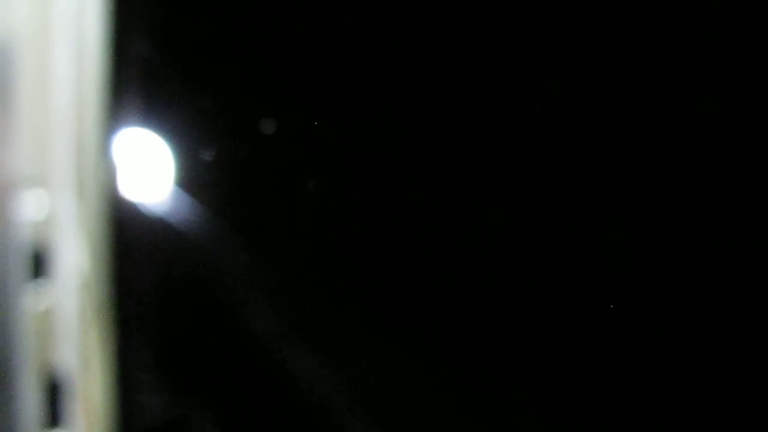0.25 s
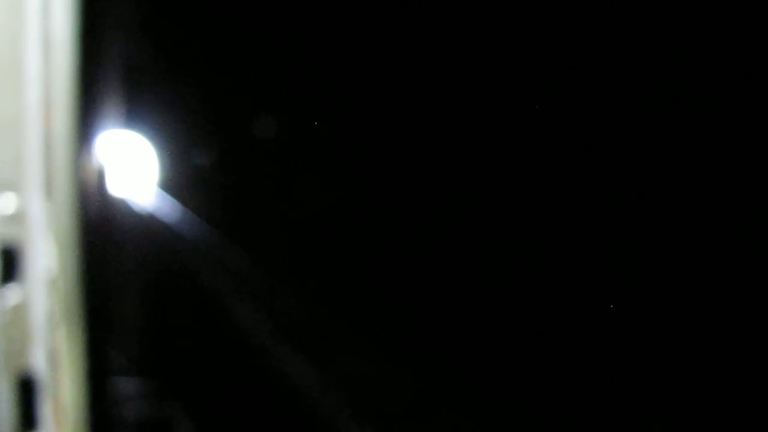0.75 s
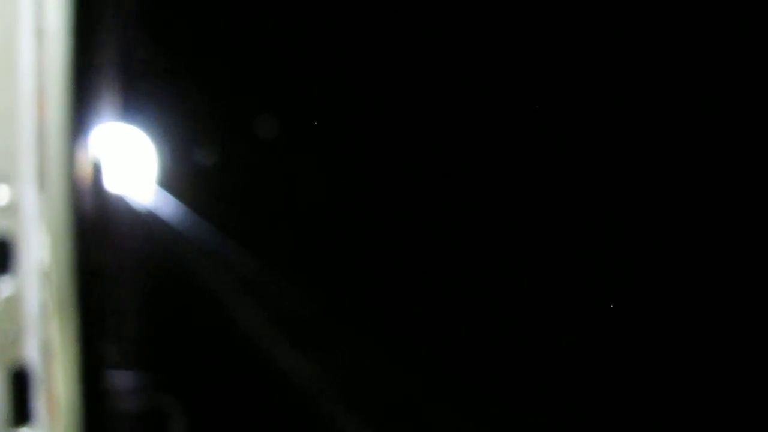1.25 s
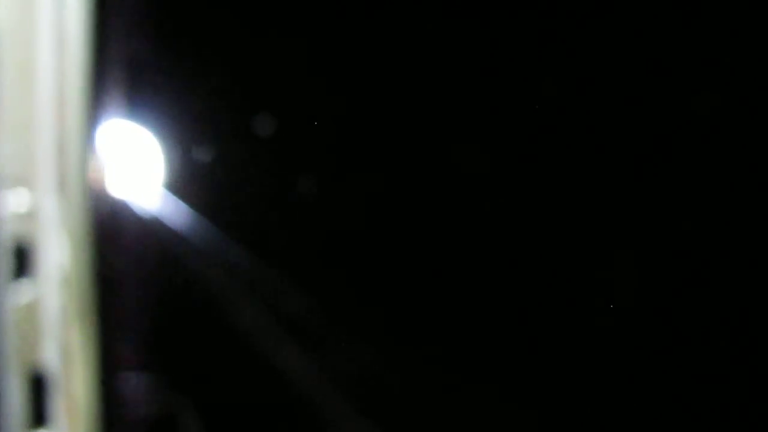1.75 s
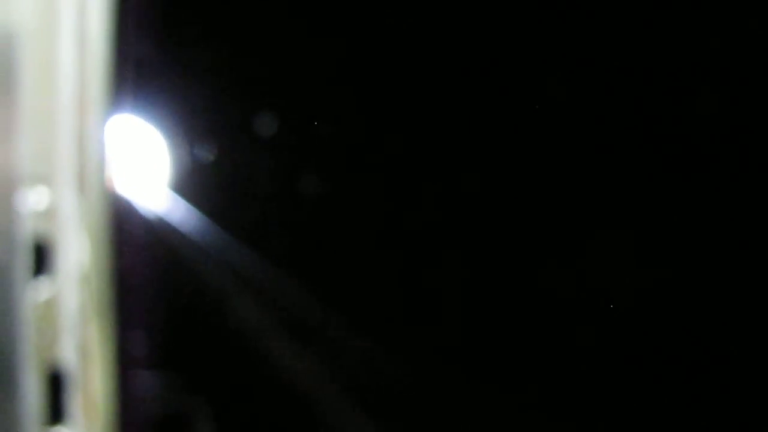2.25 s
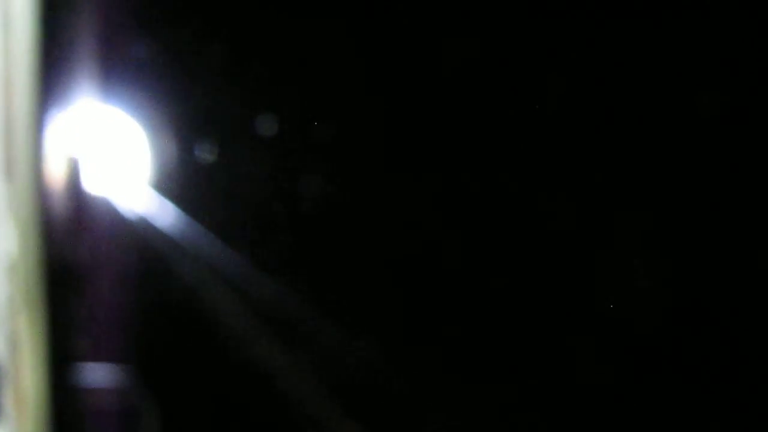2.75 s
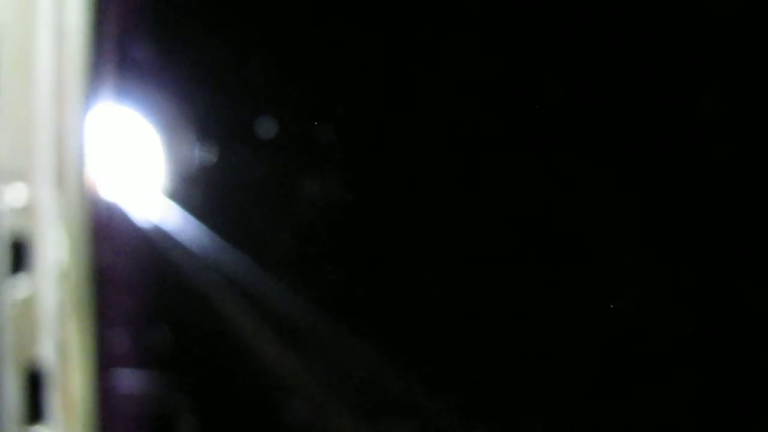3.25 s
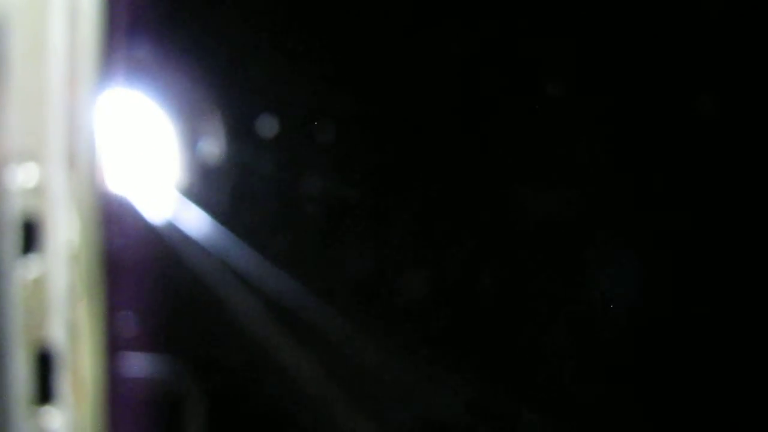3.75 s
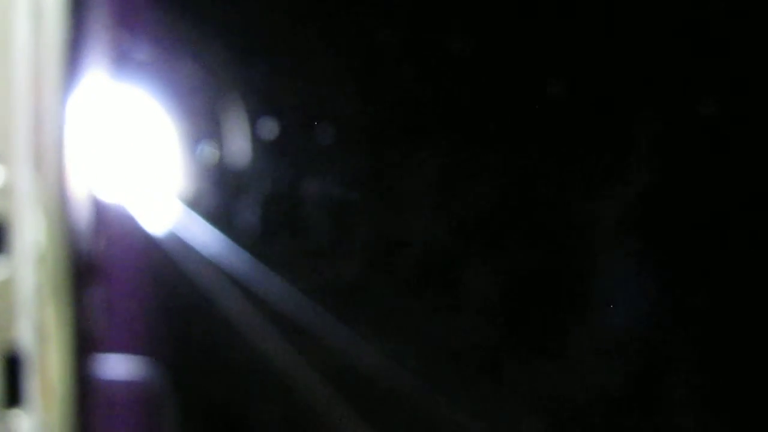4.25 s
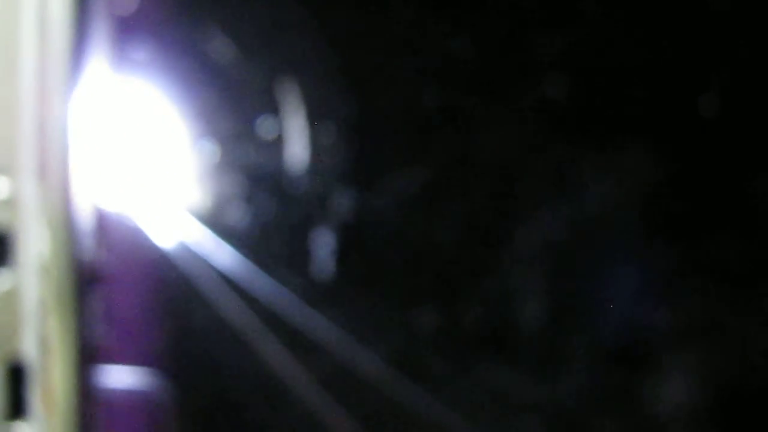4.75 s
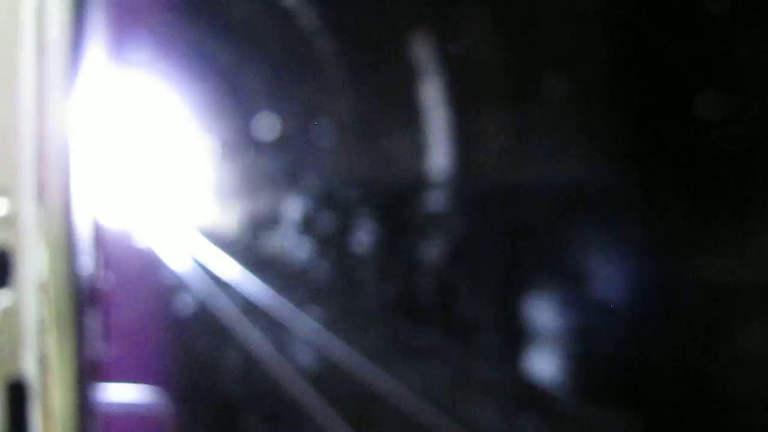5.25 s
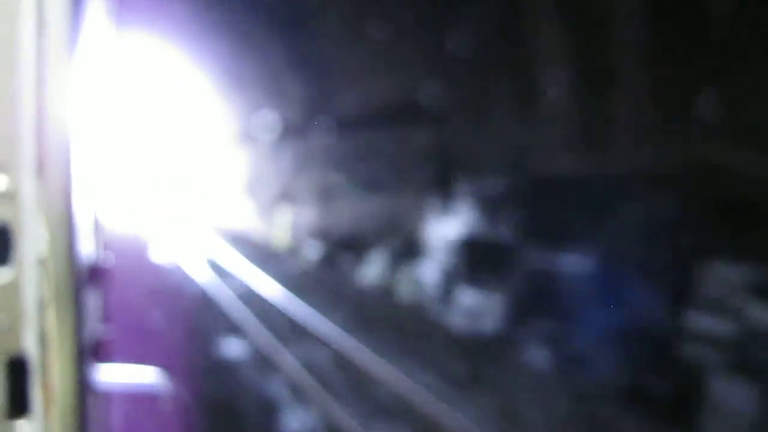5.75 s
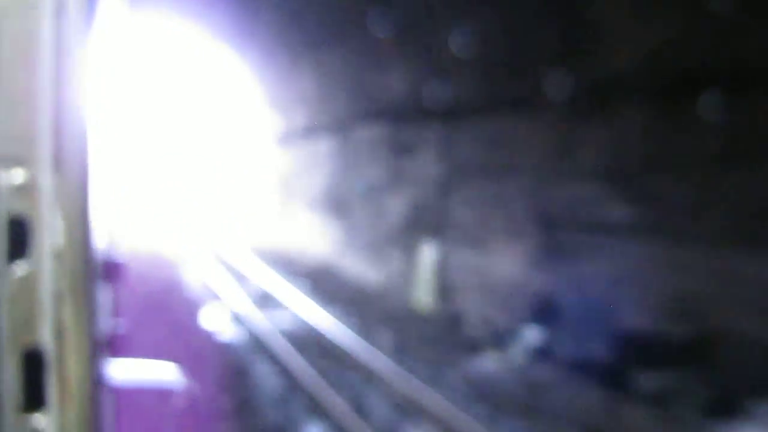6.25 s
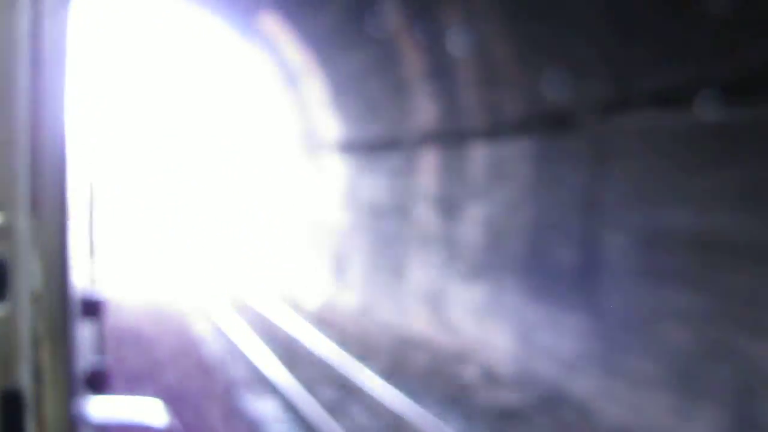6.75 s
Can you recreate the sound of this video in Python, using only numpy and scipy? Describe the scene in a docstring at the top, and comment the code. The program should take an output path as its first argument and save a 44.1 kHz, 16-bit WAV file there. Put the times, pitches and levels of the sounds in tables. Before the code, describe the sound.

At the open window of a train carriage in a tunnel, harsh wind thumps and flutters against the microphone, clipping in rasping bursts. Beneath it the wheels roar and ring steadily. A thin whine rises midway and fades, faint high steel singing comes and goes, and a bright hiss grows towards the tunnel mouth.

```python
"""In a railway tunnel, at the open window of a passenger carriage: the train runs towards the tunnel mouth.
Coloured noise makes the wheels roar and ring; narrow noise bands make a whine and the thin song of flanges.
At two microphone ports in the slipstream, noise that follows gusts and lulls makes the buffeting,
with knocks, puffs and ticks; the hardest blasts overload the ports and rasp."""
import sys
import numpy as np
from scipy import signal
from scipy.fft import irfft
from scipy.io import wavfile
from scipy.ndimage import uniform_filter1d, map_coordinates

SR = 44100
rng = np.random.default_rng(int(sys.argv[2]) if len(sys.argv) > 2 else 0)


def int16_out(signal):
    """Quantize to a 16-bit WAV file."""
    q = np.round(np.clip(np.atleast_2d(signal).T, -1, 1) * 32767)
    wavfile.write(sys.argv[1], SR, q.astype(np.int16))


N = 309096
TIME = np.arange(N) / SR   # s
BINS = np.maximum(np.arange(N // 2 + 1) * SR / N, 1)   # Hz

# Bright hiss off the rails, towards the tunnel mouth. Each row: time in seconds, level in dB.
MOUTH_LEVEL = [(0, -88), (3.2, -59), (4.6, -64), (6.0, -50.5), (6.4, -47), (7.01, -45)]
# Its colour. Each row: frequency in Hz, relative density in dB per Hz.
HISS_COLOUR = [(2000, -15), (3400, 6), (5000, 6), (7000, 3), (9000, 4.5), (12000, 8.5), (16000, 7)]

# Spells in which a flange sings on the rail. Each row: start in seconds, end in seconds,
# relative level in dB, band (0 low, 1 middle, 2 top).
SINGING_SPELLS = [(0.0, 1.45, -66, 2), (0.0, 0.2, -68, 1), (0.846, 1.35, -65, 1), (1.8, 2.701, -69, 2),
                  (2.15, 2.749, -62, 1), (3.6, 5.051, -57.5, 0), (3.6, 5.202, -67, 2),
                  (5.75, 6.749, -66, 2), (6.2, 7.007, -68, 0), (6.601, 7.012, -62, 1)]
# The bands they sing in. Each row: centre in Hz, width in Hz before squaring, relative level in dB,
# faint singing between spells in relative dB.
SINGING_BANDS = [(9370, 1900, -8.5, -62), (14000, 730, 6.5, -76), (15250, 800, 10, -79)]
SING_RISE_S, SING_FALL_S = 0.12, 0.26   # time constants

# One wheel whines for a while.
WHINE_HZ, WHINE_WIDTH_HZ = 1583, 12   # width before squaring
WHINE_WAVER_DB = 0.06   # wavering of the speed, heard as pitch
WHINE_PEAK_S, WHINE_HOLD_S, WHINE_DB = 3.58, 0.23, -40.5
WHINE_RISE_DB_PER_S, WHINE_FALL_DB_PER_S = 45, 13

# Rough low middle of the roar. Each row: time in seconds, level in dB.
GROWL_LEVEL = [(2.4, -35.5), (3.6, -32.5), (5.4, -30.5), (6.1, -42)]
# Rolling noise between the tunnel walls. Each row: time in seconds, relative level in dB.
ROLLING_LEVEL = [(0.0, -43.5), (1.1, -44), (1.7, -43.5), (2.5, -44), (3.7, -42.5), (6.2, -43), (7.01, -41)]
# Its broad colour. Each row: frequency in Hz, relative density in dB per Hz.
ROAR_COLOUR = [(30, 4.5), (110, 5.5), (250, -2.5), (450, -5), (750, -5), (1000, -10.5), (1300, -16.5),
               (2200, -19.5), (3500, -22), (5000, -29.5), (6500, -31.5), (8000, -38), (11500, -47),
               (16000, -48)]
# How alike the roar is at both ports. Each row: frequency in Hz, likeness (0 unrelated, 1 the same).
ROAR_LIKENESS = [(100, 0), (600, 1), (1600, 0.61), (3000, 0.18), (7000, 0), (16000, 0)]
# Resonances of the wheels. Each row: centre in Hz, width in Hz before squaring, relative level in dB.
WHEEL_RESONANCES = [(556, 132, 3.5), (1042, 170, -6.5), (1598, 290, -10.5), (2686, 350, -18),
                    (4440, 380, -28), (5650, 740, -29)]

# Slipstream between gusts. Each row: time in seconds, strength in dB.
FLOW_STRENGTH = [(0.0, -0.79), (1.5, 0.21), (5.7, 0.37), (7.01, -0.5)]
# Gusts along the carriage. Each row: centre in seconds, rise in dB, half-length in seconds,
# side (-1 left to 1 right).
GUST_SWELLS = [(0.161, 2.5, 0.062, -0.13), (0.433, 5, 0.032, -0.88), (0.647, 3, 0.051, -1.1),
               (0.818, 6, 0.02, -0.92), (0.924, 3.0, 0.048, 0.64), (0.99, 3.5, 0.037, -0.49),
               (1.062, 4.5, 0.019, 0.98), (1.361, 3.5, 0.062, 0.57), (1.607, 6, 0.02407, 0),
               (1.8, 2.5, 0.0851, -0.202), (2.004, 3.5, 0.03, -0.44), (2.128, 6.5, 0.034, -0.032),
               (2.245, 4, 0.04495, 0.99), (2.807, 5, 0.016, -0.65), (3.389, 3.5, 0.041, 0.22),
               (3.528, 4.5, 0.018, -0.32), (3.622, 5, 0.017, -0.99), (3.655, 4, 0.015, 0.94),
               (3.73, 4.5, 0.024, -0.9), (3.872, 5, 0.025, -0.65), (4.155, 4.5, 0.0196, -0.36),
               (4.35, 6.0, 0.023, 0.71), (4.483, 6.5, 0.023, -1), (4.663, 4, 0.021, 0.18),
               (5.008, 4, 0.12, -0.81), (5.487, 4, 0.016, -0.5), (5.705, 3.5, 0.082, -0.51),
               (5.963, 5.5, 0.091, -0.2), (6.329, 3.5, 0.019, -0.89), (6.681, 6, 0.02, -0.93)]
# Lulls, where the air stream falls away. Each row: centre in seconds, relative change in dB,
# half-length in seconds, side (-1 left to 1 right).
LULL_DIPS = [(0.045, -6, 0.064, -0.92), (0.708, -10, 0.04, 0.3), (0.856, -10, 0.022, 0.503),
             (0.885, -11, 0.038, -0.88), (1.108, -13, 0.033, -0.36), (1.25, -5, 0.049, -0.68),
             (1.268, -7, 0.016, 0.67), (1.391, -6.5, 0.02, -0.89), (1.529, -6.5, 0.047, -0.5),
             (2.247, -4, 0.056, -1), (2.447, -5, 0.031, 0.99), (2.508, -9.5, 0.031, 0.15),
             (2.578, -5.0, 0.021, -0.9), (2.727, -8.5, 0.036, -0.39), (2.978, -4, 0.045, 0.68),
             (3.152, -4.0, 0.069, 0.81), (3.376, -9, 0.16, -0.68), (3.474, -5, 0.033, 0.36),
             (3.636, -6.5, 0.077, 0.22), (3.68, -5, 0.01976, -0.807), (4.37, -6.5, 0.12, 0.72),
             (4.602, -12.5, 0.093, -0.72), (5.35, -4, 0.028, -0.15), (5.552, -7, 0.022, 0.28),
             (6.298, -6, 0.014, 0.18), (6.442, -4, 0.029, -0.35), (6.648, -10, 0.012, -0.94),
             (6.714, -5, 0.14, -0.97), (6.965, -5, 0.02, 0.61)]

# Colour of large slow swirls. Each row: frequency in Hz, relative density in dB per Hz.
SWIRL_COLOUR = [(12, -27), (25, 5), (50, 2.5), (100, 0.5), (150, -7), (250, -14), (600, -69)]
# Colour of small fast eddies, before they are swept. Each row: frequency in Hz, relative density in dB per Hz.
EDDY_COLOUR = [(30, -4), (70, 1), (130, 4), (220, -3), (350, -9), (600, -17.5), (1000, -35), (2000, -44.5),
               (5000, -63.5)]
# Colour of blasts and puffs. Each row: frequency in Hz, relative density in dB per Hz.
RASP_COLOUR_CURVE = [(50, 0), (200, 4), (400, -3.5), (800, -8.5), (1600, -22.5), (4000, -32.5), (9000, -48),
                     (16000, -70)]
# Single eddies that knock on a port. Each row: time in seconds, relative pressure in dB,
# port (0 left, 1 right).
THUMP_HITS = [(0.092, 3.5, 1), (0.211, 4, 0), (0.215, -3, 1), (0.283, 7, 1), (0.329, 0.5, 1), (0.349, 7, 0),
              (0.402, 8, 1), (0.49, 6.5, 0), (0.546, 0, 1), (0.55, 4, 0), (0.619, 3, 0), (0.761, -2, 1),
              (0.776, -3.0, 0), (0.888, 6, 1), (0.947, 1, 0), (0.981, 1, 0), (1.02, -9, 1), (1.05, -3, 1),
              (1.16, 0, 1), (1.325, -4, 1), (1.33, 1, 0), (1.419, 7, 1), (1.47, 4, 1), (1.595, 8, 0),
              (1.622, 7.5, 0), (1.777, 4, 1), (1.804, 2.5, 1), (1.84, -5, 0), (1.861, 2.5, 0),
              (1.915, 4, 0), (1.97, 1, 1), (2.01, 7, 0), (2.055, 1.5, 1), (2.452, -0.5, 1), (2.581, -1, 1),
              (2.615, -1, 0), (2.636, 2, 1), (2.648, -0.5, 0), (2.792, 4, 1), (2.812, -2, 0), (2.892, 2, 0),
              (2.908, 4.5, 1), (3.026, 2.5, 1), (3.088, 1.5, 0), (3.369, -1, 1), (3.393, 3.5, 1),
              (3.422, 3.5, 1), (3.717, 1, 0), (3.781, 1, 0), (3.85, 2, 0), (3.864, 2.5, 1), (4.139, -3, 0),
              (4.192, 0, 0), (4.476, 0, 0), (4.849, -0.5, 0), (4.879, 3, 1), (4.996, 7.5, 1), (5.019, 3, 1),
              (5.041, 2, 0), (5.134, -4, 0), (5.174, -2, 0), (5.243, 6, 1), (5.277, 3.5, 1), (5.652, -1, 0),
              (5.746, 4, 1), (5.772, 1, 1), (5.878, -4, 0), (5.912, 3.5, 1), (5.939, -3, 0),
              (5.981, 4.5, 0), (6.006, -5, 0), (6.026, 6, 1), (6.055, 2, 1), (6.063, -5, 0),
              (6.087, -0.5, 0), (6.138, -2, 0), (6.161, 3, 0), (6.268, 4, 0), (6.333, 3, 0), (6.333, -3, 1),
              (6.554, -2, 1), (6.864, -1.2, 1), (6.89, 2.5, 0), (6.921, 5, 1), (6.996, 7, 0)]
# Colour of those knocks. Each row: frequency in Hz, relative density in dB per Hz.
THUMP_COLOUR_CURVE = [(80, -22), (170, 5.5), (280, 3), (450, -9), (700, -12), (1100, -26), (2000, -34),
                      (4000, -43), (9000, -63.5), (16000, -79)]
# Steep pressure fronts that click at a port. Each row: time in seconds, relative pressure in dB,
# port (0 left, 1 right).
TICK_FRONTS = [(0.179, 0, 1), (0.779, -2, 1), (1.353, -1, 1), (1.621, -2, 0), (1.772, 0, 1), (1.901, -1, 1),
               (2.133, 1, 1), (2.148, -4, 1), (2.202, 1, 1), (2.221, 7, 1), (2.302, -1, 0), (2.61, 1, 1),
               (2.626, -3, 0), (3.058, -5, 0), (3.391, -7, 1), (4.996, -1, 0), (5.037, -1, 1), (5.05, 0, 0),
               (5.484, 4.5, 0), (5.737, 1, 1), (5.964, 1, 1), (5.984, -2.5, 0), (6.819, 4, 1),
               (6.916, 0, 1)]
# The hardest blasts of air. Each row: time in seconds, relative pressure in dB,
# length in seconds before the rise and fall factors, port (0 left, 1 right).
HARD_BLASTS = [(0.108, 3.5, 0.006, 1), (0.158, 1, 0.0034, 0), (0.16, 3.5, 0.0025, 1), (0.445, 2, 0.0028, 0),
               (0.487, -1, 0.0038, 1), (0.768, 1, 0.0039, 1), (0.945, -1, 0.0049, 0),
               (0.982, -2.5, 0.0044, 0), (1.3, -1, 0.0021, 1), (1.326, 3, 0.0063, 1),
               (1.354, -3, 0.0026, 1), (1.359, 4, 0.0036, 0), (1.369, 2.5, 0.0054, 1),
               (1.393, 4.5, 0.0058, 1), (1.609, 2, 0.005, 1), (1.614, -1.5, 0.0072, 0),
               (1.754, 5, 0.003, 1), (1.769, 1, 0.005, 0), (1.896, 1, 0.0063, 1), (1.976, 1, 0.0034, 0),
               (2.09, 3.5, 0.0072, 1), (2.105, 5, 0.0038, 1), (2.117, 1.5, 0.012, 0), (2.118, 7, 0.0056, 1),
               (2.129, -4, 0.0075, 0), (2.139, 1, 0.013, 1), (2.153, 1, 0.0038, 0), (2.208, 2.5, 0.0093, 1),
               (2.229, 5, 0.008, 1), (2.253, 1.0, 0.0031, 1), (2.276, 5.5, 0.011, 1), (2.41, 1, 0.0039, 0),
               (2.797, -1, 0.0038, 0), (3.059, 2, 0.0031, 1), (4.005, 0.5, 0.0051, 1),
               (4.156, 1, 0.0033, 1), (4.952, 2, 0.004, 1), (4.976, 5, 0.004, 0), (5.066, 2, 0.0032, 0),
               (5.402, 2, 0.0035, 0), (5.421, 4.5, 0.0084, 1), (5.687, -2, 0.0044, 0),
               (5.725, 1, 0.0039, 0), (5.997, 1.5, 0.0037, 0), (6.166, 2, 0.0035, 1), (6.173, 1, 0.0038, 0),
               (6.437, 5.5, 0.0035, 1), (6.473, 2, 0.0029, 1), (6.487, 1, 0.015, 1)]
# Lesser blasts come at random, more often in strong flow; the rate is for one port at 0 dB of flow.
LESSER_PER_S, LESSER_DB, LESSER_SPREAD_DB, LESSER_LENGTH_S = 5.0, -3.5, 0.9, 0.0027

OVERLOAD = 0.49   # largest pressure that a port passes
CUTOFF_HZ = 15750   # top of the recorded band


def from_db(db):
    """Decibels to amplitude gain."""
    return 10 ** (np.asarray(db) / 20)


def rms_one(x):
    """Scale to an rms of 1."""
    return x / np.sqrt(np.mean(x ** 2) + 1e-20)


def in_time(rows):
    """Each column of a curve, joined by straight lines at every sample."""
    s, *columns = np.transpose(rows)
    return np.array([np.interp(TIME, s, column) for column in columns])


def over_bins(points):
    """A curve over frequency, joined on a log axis."""
    hz, value = np.transpose(points)
    return np.interp(np.log(BINS), np.log(hz), value)


def resonance(hz, width_hz):
    """Gain of one resonance, 1 on top."""
    return 1 / np.hypot(1, (BINS ** 2 - hz ** 2) / (BINS * width_hz))


def noise(gain, likeness=0):
    """Stereo noise of a given colour and left-right likeness; rms 1."""
    real = rng.standard_normal((2, len(BINS)))
    imaginary = rng.standard_normal((2, len(BINS)))
    mid, side = real + 1j * imaginary
    alike = np.clip(likeness, -1, 1)
    both = np.sqrt(1 + alike) * mid + np.sqrt(1 - alike) * side * [[1], [-1]]
    return rms_one(irfft(gain * both, N))


def flutter(low_hz, high_hz):
    """Random wavering between two rates, different at each port; rms 1."""
    slow_cut = 1 + (low_hz / BINS) ** 4
    fast_cut = 1 + (BINS / high_hz) ** 4
    return noise(1 / np.sqrt(slow_cut * fast_cut))


def evened(x, window_s):
    """Noise with its chance swells evened out, so that an envelope sets its strength; rms 1."""
    power = uniform_filter1d(x ** 2, max(int(window_s * SR), 3), axis=-1)
    return rms_one(x / np.sqrt(np.abs(power) + .05 * power.mean()))


def filtered(x, kind, hz, order):
    """Butterworth high- or low-pass."""
    sections = signal.butter(order, min(hz, .45 * SR), kind, fs=SR, output="sos")
    return signal.sosfilt(sections, x)


def panned(right_db):
    """Gains of the two ports for a sound that is louder on the right by this much."""
    return from_db(right_db * np.array([[-.5], [.5]]))


def swept(pattern, speed):
    """A frozen pattern of pressure passes each port: more speed, higher pitch."""
    travelled = np.cumsum(speed, axis=1) % (N - 1)
    return np.array([map_coordinates(p, [d], order=3) for p, d in zip(pattern, travelled)])


def burst(s, rise_s, fall_s):
    """The samples around a burst of pressure, their age in s and its bell-shaped rise and fall."""
    near = slice(max(int((s - .1) * SR), 0), int((s + .1) * SR))
    age_s = TIME[near] - s
    side_s = np.where(age_s < 0, rise_s, fall_s)
    return near, age_s, np.exp(-(age_s / side_s) ** 2)


def rail_hiss():
    """A broad bright hiss off the rails, strongest near the end of the tunnel."""
    return from_db(in_time(MOUTH_LEVEL)) * noise(from_db(over_bins(HISS_COLOUR)))


def singing_spell(start, end, db):
    """Gain of one spell of flange song: it rises, holds from start to end, and fades."""
    before = (start - TIME) / SING_RISE_S
    after = (TIME - end) / SING_FALL_S
    return from_db(db) * np.exp(-np.maximum(before, after).clip(0))


def flanges(level_db=8.0, waver_db=1.9):
    """Steel rubbing on steel sings in narrow high bands, in spells over a faint steady song."""
    out = 0
    for k, (hz, width_hz, band_db, faint_db) in enumerate(SINGING_BANDS):
        spells = [singing_spell(start, end, db)
                  for start, end, db, band in SINGING_SPELLS if round(band) == k]
        rubbing = np.hypot(from_db(faint_db), sum(spells))
        out = out + from_db(band_db) * rubbing * noise(resonance(hz, width_hz) ** 2)
    return from_db(level_db + waver_db * flutter(low_hz=3, high_hz=30)) * out


def whine(upper_hz=2680, upper_width_hz=140, upper_db=-20, flicker_db=1.0):
    """One wheel rings in a fine tone, wavering slightly in pitch, with a hazier upper resonance."""
    after_s = TIME - WHINE_PEAK_S
    rise_db = WHINE_RISE_DB_PER_S * after_s
    fall_db = -WHINE_FALL_DB_PER_S * (after_s - WHINE_HOLD_S).clip(0)
    level_db = WHINE_DB + np.minimum(rise_db, fall_db)
    upper = from_db(upper_db) * resonance(upper_hz, upper_width_hz) ** 2
    modes = resonance(WHINE_HZ, WHINE_WIDTH_HZ) ** 2 + upper
    speed = from_db(WHINE_WAVER_DB * flutter(low_hz=2.44, high_hz=9.2))
    tone = swept(evened(noise(modes, likeness=0.65), window_s=.04), speed)
    return from_db(level_db + flicker_db * flutter(low_hz=8, high_hz=30)) * tone


def growl(hz=450, width_hz=520, rough_db=2.5):
    """Quickly fluttering noise fills out the low middle of the roar, then sinks back near the end."""
    level_db = in_time(GROWL_LEVEL) + rough_db * flutter(low_hz=30, high_hz=70)
    return from_db(level_db) * noise(resonance(hz, width_hz) ** 3)


def wheels(roar_db=16.0, ring_db=10.0, right_db=2.5, waver_db=1.28):
    """Rough rails make the wheels roar and ring; the tunnel smears both into a steady sound."""
    rolling_db, = in_time(ROLLING_LEVEL)
    mode_powers = [(from_db(db) * resonance(hz, width_hz) ** 2) ** 2 for hz, width_hz, db in WHEEL_RESONANCES]
    modes = np.sqrt(sum(mode_powers))
    roar = from_db(rolling_db + roar_db) * noise(from_db(over_bins(ROAR_COLOUR)), over_bins(ROAR_LIKENESS))
    ring = from_db(rolling_db + ring_db) * noise(modes, likeness=0.76)
    waver = from_db(waver_db * flutter(low_hz=1.2, high_hz=15.5))
    return (roar + ring) * panned(right_db) * waver


def swells(rows):
    """Flat-topped swells of the air stream, weaker at the port on the far side; dB at each port."""
    out = np.zeros((2, N))
    for s, db, length_s, side in rows:
        near = np.abs(TIME - s) < 2 * length_s
        share = np.clip(1 + side * np.array([[-1], [1]]), 0, 1)
        out[:, near] += db * share * np.exp(-((TIME[near] - s) / length_s) ** 4)
    return out


def slipstream(lull_share=1.05, churn_db=1.5, shared_churn_db=0.89):
    """Air stream at each port in dB: flow, gusts, lulls, and churning partly common to both ports."""
    own_churn = churn_db * flutter(low_hz=9.1, high_hz=20.1)
    shared_churn = shared_churn_db * flutter(low_hz=9.2, high_hz=20.7)[0]
    shifts = swells(GUST_SWELLS) + lull_share * swells(LULL_DIPS)
    return in_time(FLOW_STRENGTH) + shifts + own_churn + shared_churn


def ticks(level_db=-12.0, edge_s=0.00004, tail_s=0.00031):
    """Pressure at a port leans one way, then snaps to the other within a fraction of a millisecond."""
    out = np.zeros((2, N))
    signs = rng.choice([-1, 1], len(TICK_FRONTS))
    for (s, pressure_db, port), sign in zip(TICK_FRONTS, signs):
        near, age_s, _ = burst(s, tail_s, tail_s)
        front = np.tanh(age_s / edge_s) * np.exp(-np.abs(age_s) / tail_s)
        out[int(round(port)), near] += sign * from_db(pressure_db) * front
    return from_db(level_db) * out


def puffs(flow_db, level_db=-29.5, spread_db=6.0, top_db=10.5, right_db=2.0):
    """The air stream breaks into many short knocking puffs, louder in gusts."""
    spread = np.minimum(flutter(low_hz=22, high_hz=81.4), 2)
    push_db = np.minimum(flow_db, top_db) + spread_db * spread
    return from_db(level_db + push_db) * panned(right_db) * noise(from_db(over_bins(RASP_COLOUR_CURVE)))


def thumps(level_db=-13.0, rise_s=0.0066, fall_s=0.0061):
    """An eddy that hits a port squarely gives a dull knock a few cycles long."""
    force = np.zeros((2, N))
    for s, pressure_db, port in THUMP_HITS:
        near, _, swell = burst(s, rise_s, fall_s)
        force[int(round(port)), near] += from_db(pressure_db) * swell
    pressure = evened(noise(from_db(over_bins(THUMP_COLOUR_CURVE))), window_s=0.0086)
    return from_db(level_db) * force * pressure


def eddies(flow_db, level_db=-18.0, flow_share=1.05, flutter_db=2.0, speed_share=.15, top_db=6.0, right_db=2.0):
    """Small eddies grow louder and quicker together as the air speeds up, until the flow saturates."""
    push_db = flow_share * np.minimum(flow_db, top_db) + flutter_db * flutter(low_hz=12.5, high_hz=59.0)
    pattern = evened(noise(from_db(over_bins(EDDY_COLOUR))), window_s=0.0276)
    pressure = swept(pattern, from_db(speed_share * push_db))
    return from_db(level_db + push_db) * panned(right_db) * pressure


def swirls(flow_db, level_db=-16.0, flow_share=1.03, flutter_db=1.2, right_db=3.5, top_db=7.5):
    """Large swirls thump against the ports, harder on the gustier side."""
    push_db = flow_share * np.minimum(flow_db, top_db) + flutter_db * flutter(low_hz=9.6, high_hz=27)
    pressure = evened(noise(from_db(over_bins(SWIRL_COLOUR))), window_s=0.0527)
    return from_db(level_db + push_db) * panned(right_db) * pressure


def lesser_blasts(flow_db):
    """Random rows of small blasts; their rate follows the flow at each port."""
    chance = LESSER_PER_S * from_db(flow_db) / SR
    ports, samples = np.nonzero(rng.random((2, N)) < chance)
    pressure_db = LESSER_DB + LESSER_SPREAD_DB * rng.standard_normal(N)
    return [(TIME[i], pressure_db[i], LESSER_LENGTH_S, port) for port, i in zip(ports, samples)]


def blasts(flow_db, swing_db=-10.0, swing_hz=260, swing_width_hz=400, rasp_db=-13.5,
           rise_lengths=0.77, fall_lengths=1.3, snap_db=-9.0, snap_s=0.00026):
    """A blast swings the pressure at one port violently, with a rasp and a sudden front that dies away."""
    force, fronts = np.zeros((2, 2, N))
    for s, pressure_db, length_s, port in HARD_BLASTS + lesser_blasts(flow_db):
        port = int(round(port))
        near, age_s, swell = burst(s, rise_lengths * length_s, fall_lengths * length_s)
        force[port, near] += from_db(pressure_db) * swell
        snap = (age_s >= 0) * np.exp(-np.abs(age_s) / snap_s)
        fronts[port, near] += from_db(pressure_db + snap_db) * snap
    swing = from_db(swing_db) * evened(noise(resonance(swing_hz, swing_width_hz) ** 3), window_s=0.0062)
    rasp = from_db(rasp_db) * evened(noise(from_db(over_bins(RASP_COLOUR_CURVE))), window_s=0.0074)
    return force * (swing + rasp) + filtered(fronts, "low", hz=3000, order=1)


def scene():
    """Wind at the ports over the sound of the train."""
    flow_db = slipstream()
    train = rail_hiss() + flanges() + whine() + growl() + wheels()
    wind = ticks() + puffs(flow_db) + thumps() + eddies(flow_db) + swirls(flow_db) + blasts(flow_db)
    return train + wind


def record(dry, bass_cut_hz=15, treble_cut_hz=10500):
    """The ports overload; the bass cut tilts the flat tops, the treble cuts dull their edges."""
    clipped = dry / (1 + (dry / OVERLOAD) ** 24) ** (1 / 24)
    tilted = filtered(clipped, "high", bass_cut_hz, order=1)
    dulled = filtered(tilted, "low", treble_cut_hz, order=2)
    band_limit = signal.ellip(10, .2, 70, CUTOFF_HZ, fs=SR, output="sos")   # steep low-pass
    return signal.sosfilt(band_limit, dulled)


dry = scene()
out = record(dry)
int16_out(out)
```